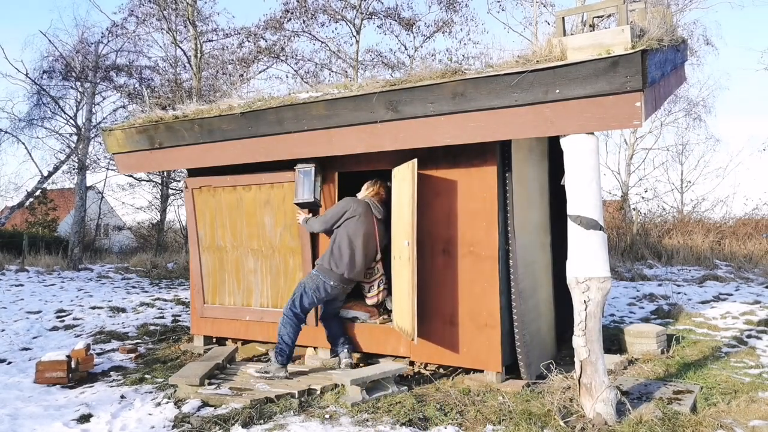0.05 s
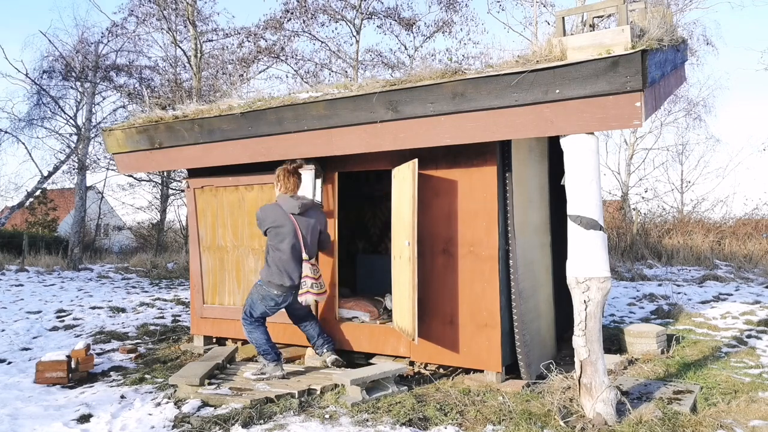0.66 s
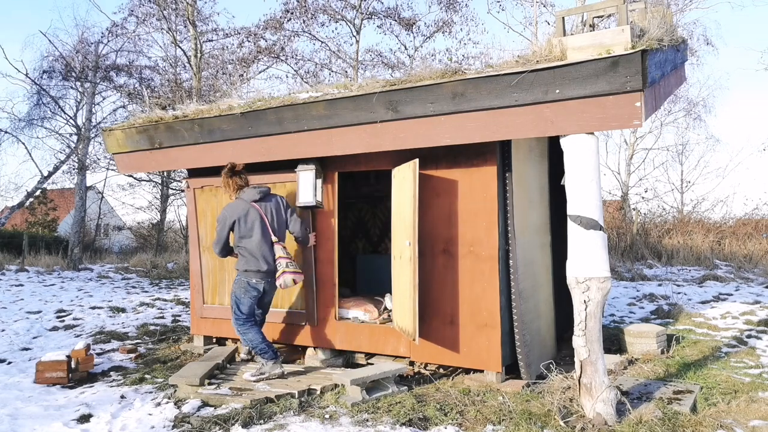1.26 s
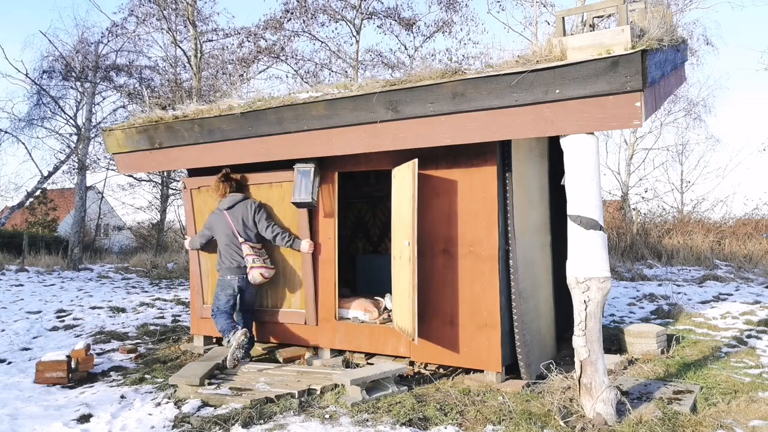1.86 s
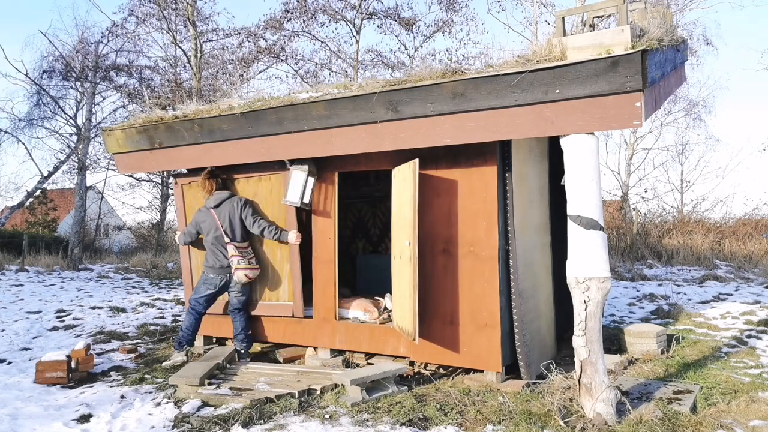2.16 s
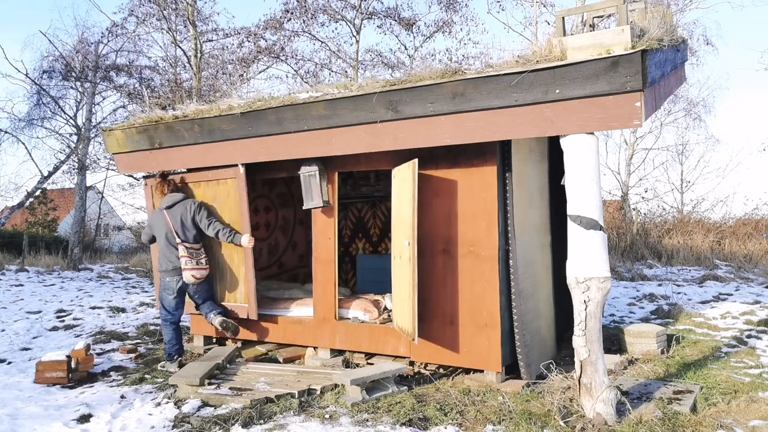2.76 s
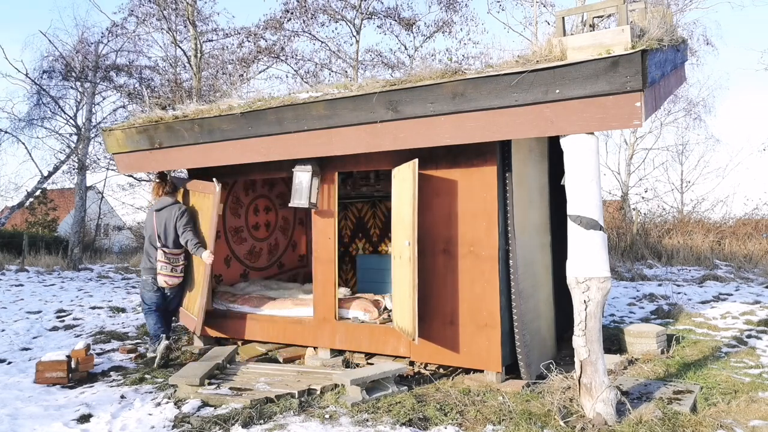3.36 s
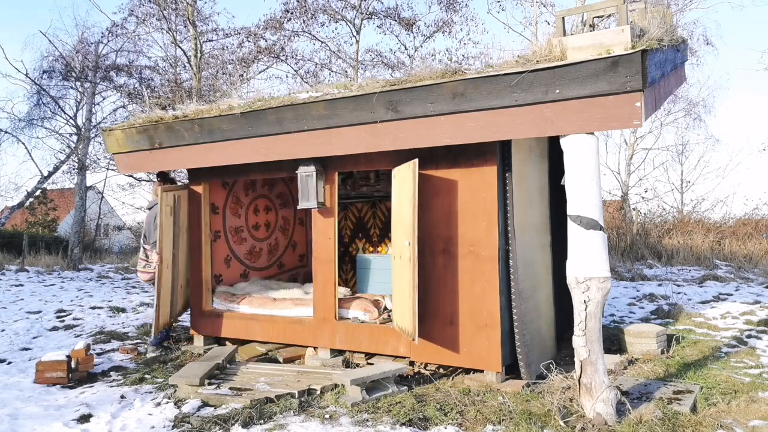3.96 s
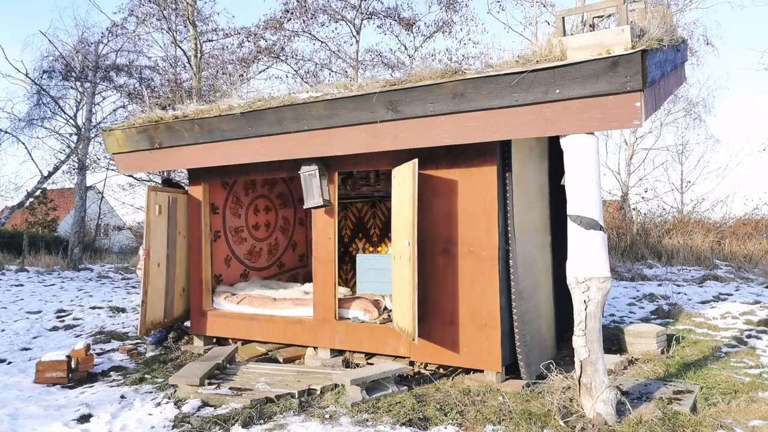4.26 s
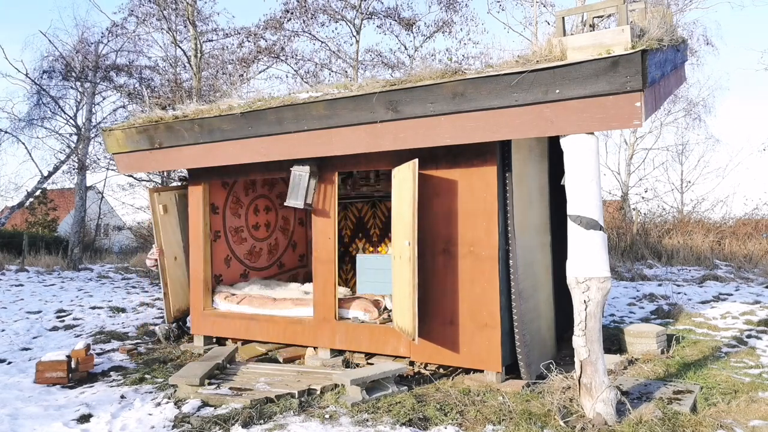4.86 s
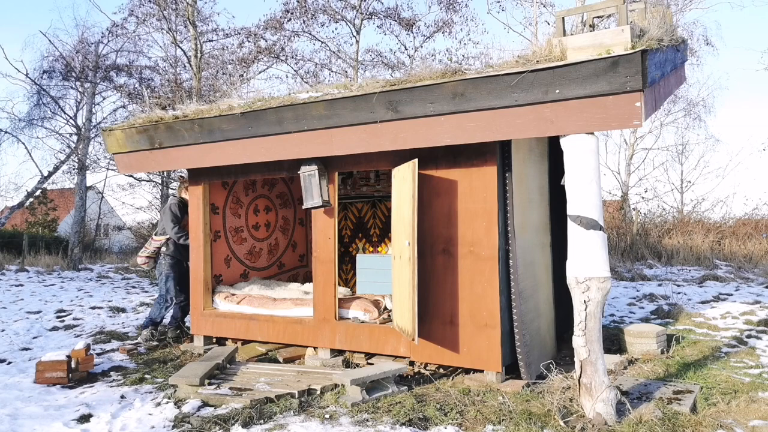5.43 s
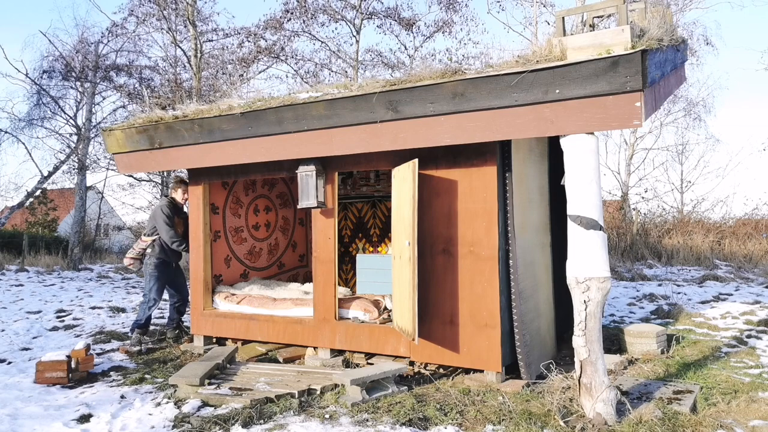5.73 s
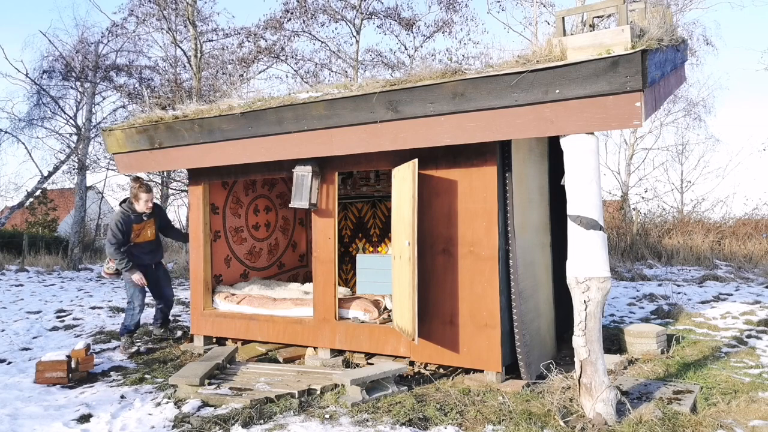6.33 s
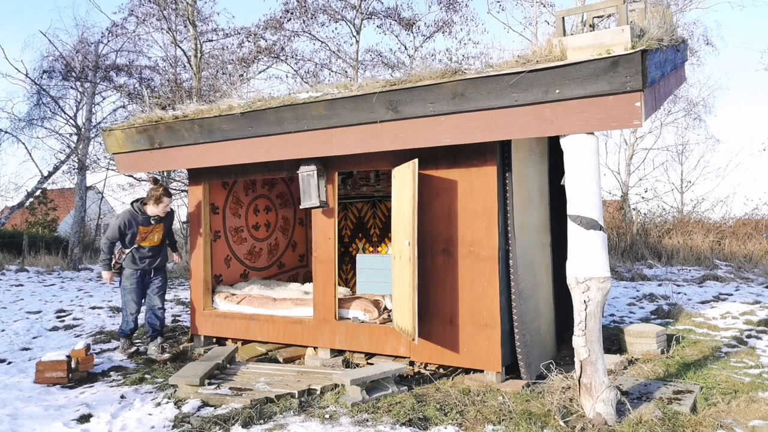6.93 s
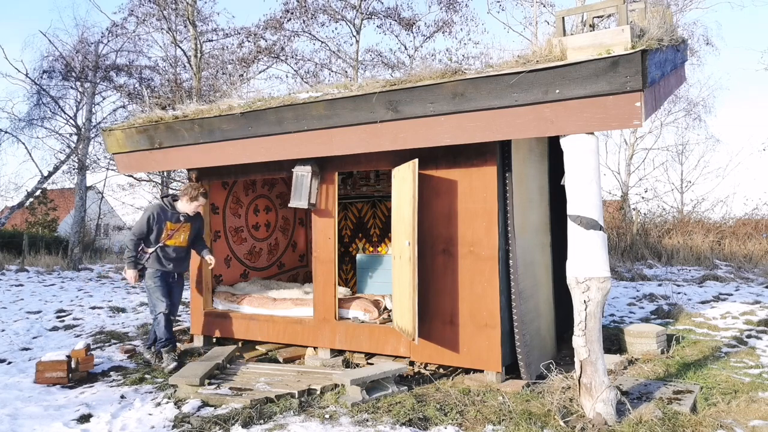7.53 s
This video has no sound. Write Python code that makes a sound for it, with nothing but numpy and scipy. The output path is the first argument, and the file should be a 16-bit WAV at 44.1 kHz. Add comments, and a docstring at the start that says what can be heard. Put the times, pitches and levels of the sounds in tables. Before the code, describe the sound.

Outside a small wooden cabin, shoes crunch softly on frozen ground and a nudged lantern rings faintly. A wall panel is pulled loose and hauled aside with hollow thuds, scraping and clunking fittings. After a short lull it squeaks, a steel bolt pings, and the panel bangs and judders along the side wall. A few lighter knocks follow. The wood sounds near the middle, over faint outdoor background noise.

```python
"""A wooden wall panel of a small garden cabin is unlatched, hauled aside and shoved along the side wall.
Blows ring the panel and the hollow cabin; between them it rubs, judders and squeaks.
Loose fittings clunk, a steel bolt pings and a nudged lantern rings.
Shoes crunch on frozen ground and a jacket rustles, over faint background noise.
The right channel lags the left by 7 ms."""
import sys
import numpy as np
from scipy import signal
from scipy.fft import rfft, irfft, next_fast_len
from scipy.io import wavfile
from scipy.ndimage import uniform_filter1d

SR = 44100
rng = np.random.default_rng(int(sys.argv[2]) if len(sys.argv) > 2 else 0)


def materialize(psi):
    """Save the field psi as 16-bit PCM at rate SR to the path in sys.argv[1].

    A 1-D psi becomes a single channel; in a 2-D psi each row is a channel.
    """
    bounded = np.clip(np.atleast_2d(psi).T, -1, 1)
    quanta = np.round(bounded * 32767).astype(np.int16)
    wavfile.write(sys.argv[1], SR, quanta)


N = 334717
TIME_S = np.arange(N) / SR
RING_S = np.arange(SR // 2) / SR  # time axis of one short event

# Spectra of background noise, rustle, rub and judder. Each row: frequency in Hz, relative density in dB.
BACKGROUND_SPECTRUM = [(20, 4.5), (50, 6.5), (100, -5.5), (300, -7), (900, -7.5), (1650, -13.5),
                       (2100, -29), (3200, -24), (5000, -30), (10000, -30), (16000, -43.5)]
RUSTLE_SPECTRUM = [(900, -15.5), (2100, 0.5), (3200, 2.5), (5000, -2), (8000, -0.5), (12000, -4.5),
                   (15500, -24.5)]
RUB_SPECTRUM = [(120, -39), (280, -10), (480, 0.5), (800, 2.5), (1100, -1.5), (1650, -4), (2100, -15.5),
                (3000, -7.5), (5000, -17.5), (14000, -25.5)]
JUDDER_SPECTRUM = [(20, -3), (45, 4), (70, 0), (125, -4), (190, -8), (280, -5), (400, -15.5), (800, -54.5)]
# Sleeves and shoes brushing past. Each row: centre in seconds, half length in seconds, level in dB.
SWISHES = [(0.627, 0.019, -66), (1.008, 0.057, -65.5), (1.52, 0.012, -66), (2.27, 0.0089, -62),
           (3.143, 0.042, -55.5), (4.189, .03, -63), (4.948, 0.15, -57.5)]
# Steps and scuffs. Each row: start in seconds, sole level in dB, crunch level in dB, t60 in seconds.
STEPS = [(0.058, -58, -64, 0.053), (0.135, -59, -67, 0.087), (0.213, -47.5, -57.5, 0.16),
         (0.244, -59, -68, 0.058), (0.325, -53.5, -63.5, 0.33), (0.404, -59, -68, 0.3),
         (0.524, -56, -54.5, 1), (0.612, -50, -60.5, 0.33), (0.665, -60, -64, 0.012),
         (0.815, -49, -54, 0.24), (0.922, -49.5, -60, 0.15), (1.146, -54.5, -61, 0.49),
         (1.547, -53.5, -58.5, 1), (1.612, -53, -64, 0.09), (1.719, -46, -58.5, 0.36),
         (1.811, -49, -56.5, 0.0081), (3.16, -49.5, -64, 0.017), (3.991, -84, -69, 0.033),
         (4.178, -78, -64, 0.1), (4.787, -72, -63.5, 0.017), (6.283, -77, -69, 0.027),
         (6.806, -82, -67, 0.027), (7.539, -62, -69, .25)]
# Hits on the hanging lantern and the steel bolt. Each row: start in seconds, level in dB, t60 factor.
LANTERN_HITS = [(.55, -66, .7), (.815, -55.5, 1), (.925, -63, 1)]
BOLT_HITS = [(5.272, -50, 0.77), (5.395, -37, 1), (5.565, -58, 1), (6.984, -64.5, 0.58)]
# Their modes. Each row: frequency in Hz, relative level in dB, base t60 in seconds.
LANTERN_MODES = [(846, 0, 2.0), (1131, -9, .8), (1322, -6, .7)]
BOLT_MODES = [(7300, -5, .5), (7345, -14, .25), (7520, -15, .15), (8400, -10, .2), (8465, -2, .2),
              (8590, -7, .15), (8700, -8, .5)]
# Loose fittings on the carried panel. Each row: start in seconds, low ring in dB, high ring in dB.
CLUNKS = [(2.611, -30.5, -34), (2.82, -43.5, -46), (2.913, -49, -41.5), (2.979, -48.5, -57),
          (3.073, -48, -54.5), (3.191, -48.5, -64), (3.273, -44.5, -42.5), (3.745, -40, -48)]
# Modes of the fittings and of the panel in its frame. Each row: frequency in Hz, relative level in dB.
FITTING_MODES = [(420, 12), (549, 6), (624, -1), (689, 2), (764, -3.5), (910, -13), (1050, -20), (1195, 21),
                 (1319, 17), (1427, 0)]
PANEL_MODES = [(43, 8.5), (97, 2.5), (172, -8), (205, 14), (248, 11.5), (280, -15.5), (393, 9.5), (474, 2),
               (533, 12.5), (624, -16), (694, 1.5), (775, -1), (877, -1.5), (937, 7), (1061, 7),
               (1206, -7.5), (1287, -8), (1384, 13), (1529, 8.5), (1653, -29.5), (1809, 7.5), (2019, -0.5),
               (2245, -13), (2455, -2.5), (2649, 3.5), (2853, 1.5), (3068, 4), (3386, 2)]
# Squeaks of a dragging edge. Each row: start, peak and end in seconds, level in dB,
# start pitch, end pitch and bandwidth in Hz.
SQUEAKS = [(0.204, 0.24, 0.3, -55, 1193, 1120, 80), (0.897, 0.997, 1.2, -60, 1277, 1345, 70),
           (1.629, 1.756, 1.75, -48, 1360, 1460, 130), (2.787, 2.877, 3.02, -49.5, 1290, 1506, 90),
           (4.9, 5.008, 5.3, -45.5, 1460, 1476, 30), (5.0, 5.08, 5.35, -44.5, 2936, 2555, 40),
           (5.018, 5.132, 5.18, -31.5, 1503, 1670, 60), (4.978, 5.14, 5.35, -27.5, 1067, 896, 25),
           (7.35, 7.378, 7.6, -56, 1620, 1560, 110)]
# Pulls and shoves. Each row: start, end and build-up in seconds, then rub, judder and hiss in dB.
DRAGS = [(-.02, 0.248, 0.0086, -59.5, -64.5, -66.5), (0.728, 0.997, 0.033, -56.5, -69, -70),
         (1.467, 1.552, 0.043, -76, -76, -66.5), (1.553, 1.836, 0.0084, -61.5, -77, -72),
         (1.831, 2.017, .014, -53, -45, -76), (2.301, 2.335, 0.0072, -38, -49.5, -40),
         (2.347, 2.5, 0.013, -47.5, -48.5, -64), (2.652, 2.688, .008, -44.5, -38.5, -61),
         (2.77, 2.987, 0.018, -53.5, -50, -66), (2.973, 3.168, 0.012, -57, -55, -72),
         (3.442, 3.605, 0.007, -62.5, -42.5, -89), (3.71, 3.866, 0.016, -64, -50.5, -91),
         (4.04, 4.122, 0.016, -88, -68, -62), (4.307, 4.45, 0.0082, -63, -63.5, -88),
         (4.568, 4.927, 0.19, -50.5, -51, -66), (4.883, 5.125, 0.13, -48, -60, -49),
         (5.128, 5.16, 0.0089, -32, -41, -44), (5.197, 5.294, .014, -43.5, -53.5, -52.5),
         (5.338, 5.406, 0.013, -38.5, -25, -61), (5.536, 5.572, 0.012, -38, -42, -52),
         (5.638, 5.826, 0.023, -56, -31.5, -58.5), (5.918, 6.005, 0.0083, -40.5, -28.5, -63),
         (6.039, 6.215, .014, -50.5, -32, -68), (6.421, 6.69, 0.026, -49.5, -54, -70.5),
         (6.756, 6.858, 0.0091, -70.5, -41.5, -67), (7.337, 7.416, 0.0053, -65, -61, -68.5)]
# Die-away of a drag: time constants of rub, judder and hiss in seconds.
DRAG_RELEASE_S = (0.059, 0.068, 0.031)
# Faint, steady friction of carrying: start, end and build-up in seconds; rub, judder and hiss in dB.
CARRY_SPAN_S = (1.55, 6.9, .014)
CARRY_DB = (-69.5, -63, -79)
# Blows on the panel. Each row: start in seconds, base levels of wood, cabin thud and contact crack in dB,
# hardness 0-1, t60 factor, place along the panel 0-1, then the struck board's note: pitch in Hz,
# level in dB, t60 in seconds.
KNOCKS = [(0.532, -65, -80, -81, .5, 1.1, .3, 755, -56, 0.13),
          (1.548, -57, -73, -76, 0.76, 1.1, 0.29, 320, -54, 0.024),
          (1.862, -67.5, -44, -64, 0.83, 8.2, 0.2, 443, -44.5, 0.13),
          (1.933, -39.5, -39, -38.5, 0.92, 1.27, .57, 1290, -38, 0.06),
          (1.946, -36.5, -58, -37.5, 0.1, 2.1, 0.5, 542, -36.5, 0.22),
          (2.143, -58, -24.5, -75, 0.1, .8, 0.6, 89, -34.5, 0.15),
          (2.157, -40.5, -23.5, -56.5, 0.05, 0.89, 0.5, 48.3, -25.5, 0.15),
          (2.221, -46, -37.5, -87, .7, 5.3, 0.16, 422, -40, 0.24),
          (2.282, -16, -19, -47, 0.4, 0.62, .5, 232, -19, 0.078),
          (2.289, -36.5, -32, -40.5, 0.7, 1.2, .1, 767, -26, 0.054),
          (2.297, -26.5, -23, -43, .6, 0.61, .3, 447, -26, .05),
          (2.311, -47, -35, -37.5, 0.6, 0.86, 0.5, 293, -27, 0.17),
          (2.328, -33.5, -22, -35.5, 0.4, 1.3, 0.5, 553, -39.5, 0.55),
          (2.654, -37, -36.5, -56, 0.72, 0.94, .23, 640, -41, 0.091),
          (2.766, -58, -36.5, -85, .6, 0.68, .49, 54, -34.5, 0.32),
          (3.327, -24, -11.5, -44, 0.52, 0.85, .28, 244.4, -20.5, 0.13),
          (3.348, -53, -68, -53.5, 0.52, 0.49, 0.24, 246.2, -28, 0.2),
          (3.384, -73, -22.5, -87, .4, 1.7, 0.2, 247, -45, 0.14),
          (3.577, -53, -59.5, -74, 1, .8, 0.5, 380, -48, 0.045),
          (3.682, -38.5, -33.5, -48, 0.4, 1.5, .22, 426, -39, 0.17),
          (4.054, -54.5, -70.5, -74, 1, 1.2, 0.22, 306, -53.5, 0.087),
          (4.873, -46.5, -34.5, -60, 0.8, 1.2, 0.2, 193.3, -34.5, 0.47),
          (4.991, -45, -68, -63, 0.8, 1.6, 0.36, 396.5, -40, .18),
          (5.126, -13.5, -18, -29.5, 0.4, 0.19, .29, 288.7, -14.5, 0.16),
          (5.139, -12.5, -34.5, -21, 0.01, 0.57, .29, 620, -33.5, 0.056),
          (5.191, -29, -38, -28, 0.16, 0.6, .11, 2065, -26.5, 0.015),
          (5.198, -32.5, -36.5, -36.5, 0, 1, .3, 547, -23, 0.067),
          (5.271, -36.5, -75, -27.5, 0.13, 0.7, 0.2, 2800, -32.5, 0.0099),
          (5.323, -24.5, -21.5, -43, 0.7, 2, 0.5, 850, -35.5, 0.032),
          (5.332, -28.5, -12, -23.5, 0.54, 0.21, .5, 434, -21.5, 0.07),
          (5.338, -14, -11.5, -27.5, 0.3, 0.52, 0.2, 548, -17.5, 0.054),
          (5.344, -27.5, -28.5, -44, 0.5, .5, 0.6, 600, -20.5, 0.089),
          (5.352, -32, -10, -46, .5, 1.58, 0.4, 700, -21, 0.13),
          (5.366, -22.5, -18, -53.5, 0.74, 2.1, .21, 257, -27, 0.21),
          (5.389, -42, -43.5, -42, 0.4, 0.25, 0.1, 763, -29.5, 0.099),
          (5.395, -21.5, -26, -21, 0.28, .5, 0.7, 409, -25, 0.089),
          (5.432, -35, -18, -69, 0.6, 0.74, 0.5, 251, -27.5, 0.076),
          (5.494, -22.5, -25.5, -33, 0.42, 3.8, 0.2, 572, -28, 0.11),
          (5.527, -37.5, -21, -46.5, 0.8, 2.4, .16, 558, -21.5, 0.12),
          (5.553, -24, -28.5, -47, 0.93, 1.1, .16, 220, -24.5, 0.091),
          (5.563, -17.5, -13, -35, 0.55, 0.76, 0.1, 207, -18.5, 0.2),
          (5.599, -51, -24, -58, 0.4, 0.93, 0, 534, -34.5, 0.12),
          (5.632, -40, -16.5, -45.5, 0.15, 1.4, .29, 1320, -45, 0.081),
          (5.68, -33.5, -28, -46.5, 0.73, 5.6, 0.2, 547, -32.5, 0.22),
          (5.725, -24.5, -22, -45, 0.55, 1.4, 0.6, 208, -19, 0.16),
          (5.738, -33.5, -36, -37.5, 0.1, .8, .3, 678, -28, 0.11),
          (5.745, -20, -25.5, -38.5, 0.39, 0.96, .16, 206.4, -19, 0.19),
          (5.773, -32.5, -38.5, -53, 0.73, 0.72, 0.4, 521, -30.5, 0.096),
          (5.797, -47, -30.5, -71, 0.47, 0.44, 0, 900, -38.5, 0.052),
          (5.891, -46.5, -42.5, -52, 0, 0.73, 0, 660, -41.5, .04),
          (5.903, -33, -30, -33.5, 0.68, 0.7, 0, 578, -33, 0.051),
          (5.973, -39.5, -27.5, -49, 0.6, 0.41, 0.4, 353, -28.5, 0.06),
          (5.976, -46.5, -35, -64, 0.5, 0.42, 0.5, 824, -31, 0.017),
          (6.001, -44.5, -33, -66, 0.2, 0.31, 0.3, 500, -33, 0.047),
          (6.022, -46.5, -43.5, -41.5, 0, 0.28, 0.5, 847, -31, 0.024),
          (6.027, -36.5, -23, -67, .2, 0.98, 0.3, 294, -30.5, 0.074),
          (6.09, -32.5, -32, -37.5, 0.27, 1.3, 0.4, 804, -34, 0.037),
          (6.123, -40.5, -25, -60, 0.8, 0.64, 0.1, 925, -30.5, 0.059),
          (6.173, -35.5, -44, -58, 0.43, 0.77, 0.3, 370, -33.5, 0.086),
          (6.182, -36.5, -39.5, -49, 0.56, 0.68, 0.2, 1300, -28.5, 0.05),
          (6.191, -39, -42.5, -68, 0.25, 0.29, 0.4, 1430, -36, 0.013),
          (6.667, -36, -52, -65, 0.97, 1.5, .49, 270.6, -46, 0.18),
          (6.72, -58, -37.5, -48.5, 0.87, 1.8, 0.3, 1665, -55, .03),
          (6.733, -41, -40, -42, 0.66, 0.93, 0.5, 1660, -34.5, 0.0067),
          (6.788, -40, -37.5, -68, 0.95, 0.83, 0.08, 433, -45, 0.16),
          (6.983, -59, -51.5, -53.5, 0.15, 1.2, 0, 1547, -47, 0.018),
          (7.297, -44.5, -56.5, -50, 0.65, 1.8, 0.26, 905, -47, 0.022),
          (7.306, -34.5, -58.5, -50, 0.95, 1.27, .44, 844, -24.5, 0.017),
          (7.307, -34, -45.5, -58, 0.75, 0.8, 0.5, 1180, -28, 0.009),
          (7.32, -37, -46, -60, .5, 1.7, 0.28, 576, -43, 0.15),
          (7.336, -44, -59, -46.5, 0.93, 0.92, 0.12, 1600, -36, 0.027),
          (7.472, -66.5, -78, -66, .4, 0.54, .3, 1525, -54, .03)]
# Registers of the wood: thud, body, board, crack, tick. Each row: low and high edge in Hz,
# base t60 in seconds, dense modes in dB, first snap in dB.
REGISTERS = [(24.8, 172, 0.15, -1.5, -7), (144, 560, 0.17, 1.5, -10), (670, 1513, 0.088, 11, -3),
             (1809.6, 4320, 0.058, 0.5, -5), (3840, 12000, 0.069, -2.5, -9)]
# Each register's share of a blow. Each row: offset in dB, slope in dB per octave of the board's note.
REGISTER_SHARES = [(-1, 0), (0.5, 0.5), (-3, 5.5), (-2, 0.5), (-21.5, -0.5)]
# Colour of the panel clear of its frame. Each row: frequency in Hz, gain in dB.
FREE_PANEL_EQ = [(20, -3), (33, -7), (60, -7), (100, 0.5), (130, 2.5), (165, -2), (230, -1), (290, -2.5),
                 (400, 2), (600, -0.5), (1000, 0)]


def undb(db):
    """Decibels to gain."""
    return 10 ** (np.asarray(db) / 20)


def unit(x):
    """Scale to unit energy."""
    return x / np.sqrt(np.sum(x ** 2) + 1e-18)


def burst(x, db):
    """Scale to the energy of 20 ms at this level."""
    return unit(x) * undb(db) * np.sqrt(SR / 50)


def fade(t60_s):
    """Free decay, 60 dB down at t60_s."""
    return np.exp(-np.log(1000) * RING_S / max(t60_s, 1e-3))


def rise(tau_s):
    """Exponential onset."""
    return 1 - np.exp(-RING_S / tau_s)


def band(x, lo_hz, hi_hz, order=3):
    """Causal band-pass."""
    edges_hz = [lo_hz, min(hi_hz, SR / 2 - 1)]
    return signal.sosfilt(signal.butter(order, edges_hz, "band", fs=SR, output="sos"), x)


def equalize(x, points):
    """Filter a full track by (Hz, dB) points."""
    hz, db = np.transpose(points)
    size = next_fast_len(N)
    bins_hz = np.maximum(np.arange(size // 2 + 1) * SR / size, 1)
    gain = undb(np.interp(np.log(bins_hz), np.log(hz), db))
    return irfft(rfft(x, size) * gain, size)[:N]


def colour(x, points):
    """Equalize, then scale to unit rms."""
    return unit(equalize(x, points)) * np.sqrt(N)


def grains(size, spread_db):
    """Dense tiny slips of very unequal strength."""
    return rng.standard_normal(size) * undb(spread_db * np.minimum(rng.exponential(size=size), 6))


def drift(rate_hz):
    """Smooth random drift, spread near one."""
    hold = int(SR / rate_hz)
    stairs = np.repeat(rng.standard_normal(N // hold + 1), hold)
    return 1.3 * uniform_filter1d(uniform_filter1d(stairs, hold), hold)[:N]


def resonate(x, lo_hz, hi_hz, t60_s, count):
    """Ring a few random resonances with a short sound."""
    hz = lo_hz * (hi_hz / lo_hz) ** ((np.arange(count) + rng.random(count)) / count)
    t = RING_S[:len(RING_S) // 10]
    response = np.cos(2 * np.pi * hz[:, None] * t).sum(axis=0) * fade(t60_s)[:len(t)]
    return signal.fftconvolve(x, response)[:len(x)]


def add(track, start_s, sound):
    """Mix a sound in at start_s."""
    i = max(int(start_s * SR), 0)
    track[i:i + len(sound)] += sound[:N - i]


def background_noise(level_db=-64):
    """Faint background noise, dropping off sharply above about 1.9 kHz."""
    return colour(rng.standard_normal(N), BACKGROUND_SPECTRUM) * undb(level_db + 0.58 * drift(9.6))


def cabin_tail(x, t60_s=1, level_db=-39):
    """The hollow cabin and the garden answer with a faint, dull tail."""
    tail = band(rng.standard_normal(len(RING_S)), 40, 3200, order=1) * fade(t60_s) * rise(0.0048)
    return signal.fftconvolve(x, undb(level_db) * unit(tail))[:N]


def treble_smear(x, t60_s=0.0097, gain_db=-11):
    """A brief treble smear, different in each channel, widens the hits."""
    smear = unit(rng.standard_normal(len(RING_S)) * fade(t60_s))
    return undb(gain_db) * band(signal.fftconvolve(x, smear)[:N], 2500, 16000, order=1)


def swishes():
    """Cloth and powder snow brush in bright, smooth swells."""
    swell = sum(undb(db) * np.exp(-((TIME_S - mid_s) / half_s) ** 2) for mid_s, half_s, db in SWISHES)
    slips = grains(N, spread_db=1)
    return swell * colour(slips, [(2000, -11.5), (4500, -7), (7500, -4), (12000, -9), (15500, -20)])


def steps(plain_db=-4):
    """A sole settles and crushes frozen grains; each patch of crust rings at its own pitches."""
    out = np.zeros(N)
    for start_s, sole_db, crunch_db, t60_s in STEPS:
        weight = fade(t60_s) * rise(0.0013)
        pat = grains(len(RING_S), spread_db=4.5) * weight
        grit = grains(len(RING_S), spread_db=5) * weight
        sole = band(resonate(pat, 264, 1662, t60_s=.045, count=7), 200, 1800, order=2)
        crust = resonate(grit, 2210, 5900, t60_s=.02, count=8)
        crunch = unit(crust) + undb(plain_db) * unit(band(grit, 1700, 3300, order=1))
        add(out, start_s, burst(sole, sole_db) + burst(crunch, crunch_db))
    return out


def metal(hits, modes, firm_db=-48):
    """A small metal part rings, wavering as it moves; a light touch favours the lowest mode."""
    out = np.zeros(N)
    for start_s, hit_db, t60_factor in hits:
        upper_db = .7 * min(hit_db - firm_db, 0)
        for k, (hz, mode_db, t60_s) in enumerate(modes):
            t = TIME_S[:int(SR * t60_s)]
            level_db = hit_db + mode_db + upper_db * (k > 0) - 60 * t / (t60_s * t60_factor)
            add(out, start_s, undb(level_db) * np.sin(2 * np.pi * hz * t))
    return out * undb(1.8 * drift(30))


def clunks(split_hz=800, low_t60_s=0.082, high_t60_s=0.047, rattle_db=-6, click_db=-22):
    """A fitting clicks and knocks brightly; its hollow low ring builds a moment later."""
    hz, db = np.transpose(FITTING_MODES)
    touch, high_decay = rise(0.00087), fade(high_t60_s)
    out = np.zeros(N)
    for start_s, low_db, high_db in CLUNKS:
        detuned_hz = hz * (1 + 0.045 * rng.standard_normal(len(hz)))
        waves = undb(db)[:, None] * np.sin(2 * np.pi * detuned_hz[:, None] * RING_S)
        low = waves[hz < split_hz].sum(axis=0) * fade(low_t60_s) * rise(0.015)
        high = unit(waves[hz >= split_hz].sum(axis=0) * high_decay)
        rattle = rng.standard_normal(len(RING_S)) * high_decay
        high += undb(rattle_db) * unit(band(rattle, 1020, 1490))
        click = band(rattle * high_decay, 1550, 2230)
        bright = burst(high * touch, high_db) + burst(click * touch, high_db + click_db)
        add(out, start_s, burst(low, low_db) + bright)
    return out


def squeaks():
    """Slips feed narrow resonances that glide as the point of contact travels."""
    out = np.zeros(N)
    for start_s, peak_s, end_s, db, start_hz, end_hz, width_hz in SQUEAKS:
        t = np.arange(start_s, end_s, 1 / SR)
        phase = 2 * np.pi * np.cumsum(np.linspace(start_hz, end_hz, len(t))) / SR
        pole = np.exp(-np.pi * width_hz / SR)
        tone = np.zeros(len(t))
        for ratio, partial_db in ((1, 0), (1.17, -11), (1.5, -11), (2.6, -20)):
            slips = rng.standard_normal(len(t)) + 1j * rng.standard_normal(len(t))
            narrow = signal.lfilter([1], [1, -pole ** ratio], slips)  # higher resonances are wider
            tone += undb(partial_db) * unit(np.real(narrow * np.exp(1j * ratio * phase)))
        pressure = np.interp(t, [start_s, peak_s, end_s], [0, 1, 0]) ** 2
        add(out, start_s, unit(band(tone, 600, 5400)) * np.sqrt(len(t)) * pressure * undb(db))
    return out


def scrape(plain_db=-5, crackle_db=-3, cracks_per_s=260):
    """Gritty slips feed resonances that come and go as the contact shifts; single grains crack."""
    slips = grains(N, spread_db=5) * undb(3 * drift(56))
    rings = sum(band(slips, hz * .97, hz * 1.03, order=1) * undb(6 * drift(16))
                for hz in np.geomspace(1500, 6000, 11))
    crackle = rng.standard_normal(N) * (rng.random(N) < cracks_per_s / SR)
    return unit(rings) + undb(plain_db) * unit(slips) + undb(crackle_db) * unit(crackle)


def friction_envelopes(chatter_s=0.018, chatter_rub_db=-27, chatter_judder_db=-33.5):
    """Rub, judder and hiss gains: drags build, hold and die; blows leave the panel chattering."""
    power = np.zeros((3, N))
    for start_s, end_s, build_s, *levels_db in DRAGS + [CARRY_SPAN_S + CARRY_DB]:
        build = 1 - np.exp(-np.maximum(TIME_S - start_s, 0) / build_s)
        release = np.exp(-np.maximum(TIME_S - end_s, 0) / np.array(DRAG_RELEASE_S)[:, None])
        power += (undb(levels_db)[:, None] * build * release) ** 2
    chatter = np.exp(-RING_S / chatter_s)
    for start_s, wood_db, thud_db, *_ in KNOCKS:
        add(power[0], start_s, (undb(wood_db + chatter_rub_db) * chatter) ** 2)
        add(power[1], start_s, (undb(thud_db + chatter_judder_db) * chatter) ** 2)
    return np.sqrt(power)


def sliding(panel_t60_s=0.02, plain_db=-6, catch_db=2):
    """Wood rubs on wood: slips shake the panel's modes; the rough edge and the jacket hiss along."""
    rub_gain, judder_gain, hiss_gain = friction_envelopes()
    panel = sum(undb(db) * np.sin(2 * np.pi * hz * RING_S) for hz, db in PANEL_MODES) * fade(panel_t60_s)
    slips = grains(N, spread_db=3) * undb(catch_db * drift(45))  # the edge catches and lets go
    shaken = unit(signal.fftconvolve(slips, panel)[:N]) + undb(plain_db) * unit(rng.standard_normal(N))
    judder = colour(shaken, JUDDER_SPECTRUM) * judder_gain
    rub = colour(shaken, RUB_SPECTRUM) * rub_gain
    rustle = colour(scrape(), RUSTLE_SPECTRUM) * hiss_gain
    return judder, rub, rustle


def free_panel(x, from_s=4.4, blend_s=0.1):
    """Clear of its frame, the panel stops pumping the cabin's air and loses its deepest bass."""
    blend = np.clip((TIME_S - from_s) / blend_s, 0, 1)
    return x + (equalize(x, FREE_PANEL_EQ) - x) * blend


def knocks(contact_s=0.00053, hard_tick_db=24, mid_note_hz=506, node_floor=0.032):
    """Each blow snaps, then rings the panel's modes and the struck board's note; treble dies first."""
    hz, db = np.transpose(PANEL_MODES)
    share_db, db_per_octave = np.transpose(REGISTER_SHARES)
    waves = np.sin(2 * np.pi * hz[:, None] * RING_S)
    impulse, press = 1. * (RING_S == 0), rise(contact_s)
    out = np.zeros(N)
    for start_s, wood_db, thud_db, crack_db, hardness, t60_factor, place, *board_note in KNOCKS:
        note_hz, note_db, note_t60_s = board_note
        tick_db = crack_db + hard_tick_db * hardness
        levels_db = np.array([thud_db, wood_db, wood_db, crack_db, tick_db]) + share_db
        levels_db += db_per_octave * np.log2(note_hz / mid_note_hz)  # small boards sound brighter
        mode_shape = np.sin(np.pi * np.arange(1, len(hz) + 1) * place)
        gains = undb(db) * np.sqrt(mode_shape ** 2 + node_floor)  # weak when struck near a node
        for level_db, (lo_hz, hi_hz, t60_s, dense_db, snap_db) in zip(levels_db, REGISTERS):
            decay = fade(t60_s * t60_factor) * press
            modes = (gains * (hz >= lo_hz) * (hz < hi_hz)) @ waves * decay
            ring = unit(band(modes, lo_hz / 2, hi_hz * 2, order=2))
            dense = unit(band(grains(len(RING_S), spread_db=3.5) * decay, lo_hz, hi_hz))
            snap = unit(band(impulse, lo_hz, hi_hz))
            wood = ring + undb(dense_db) * dense + undb(snap_db) * snap
            radiated = band(wood, 3.4, 1500, order=1)  # wood radiates less towards the top
            add(out, start_s, -burst(radiated, level_db))
        note = np.cos(2 * np.pi * note_hz * RING_S) * fade(note_t60_s) * press
        add(out, start_s, burst(note, note_db))
    return out


def scene(soft_right_db=-4, swish_right_db=-7):
    """Wood in the middle; the soft sounds lean left, the swishes most."""
    struck = knocks() + clunks() + metal(BOLT_HITS, BOLT_MODES)
    judder, rub, rustle = sliding()
    # tail and smear are drawn anew for each channel
    sides = [free_panel(struck + judder + cabin_tail(struck) + treble_smear(struck)) for _ in range(2)]
    wood = np.array(sides) + rub + squeaks()
    soft = steps() + metal(LANTERN_HITS, LANTERN_MODES) + rustle + background_noise()
    swish = swishes()
    return wood + np.array([soft + swish, undb(soft_right_db) * soft + undb(swish_right_db) * swish])


def record(dry, right_lag_s=306.7 / SR, right_db=-.6, ceiling=.95, top_hz=15600):
    """The right channel lags, slightly softer and duller; peaks are rounded and the top is cut."""
    right = undb(right_db) * np.interp(TIME_S - right_lag_s, TIME_S, dry[1], left=0)
    rounded = ceiling * np.tanh(np.array([dry[0], right]) / ceiling)
    return signal.sosfilt(signal.ellip(8, .2, 70, top_hz, fs=SR, output="sos"), rounded)


dry = scene()
out = record(dry)
materialize(out)
```